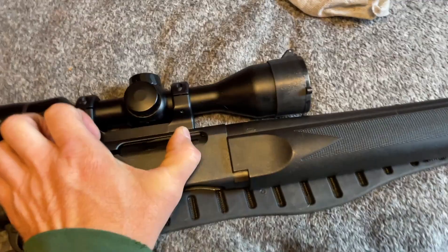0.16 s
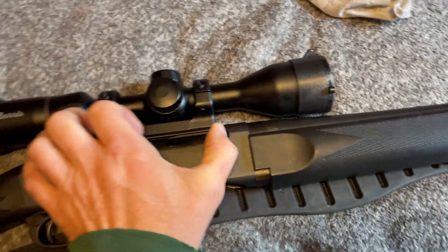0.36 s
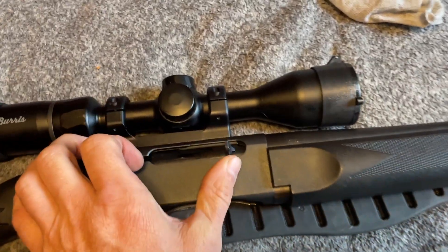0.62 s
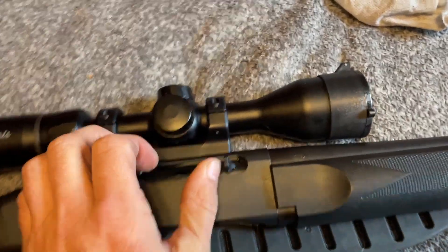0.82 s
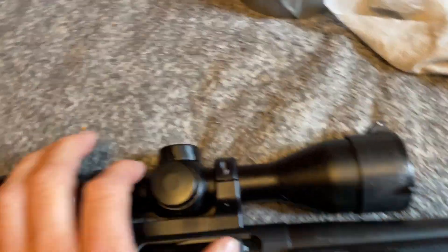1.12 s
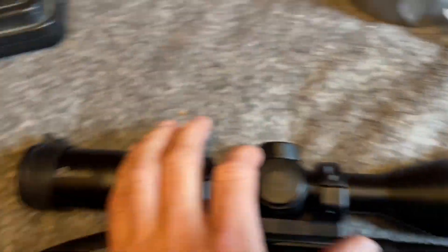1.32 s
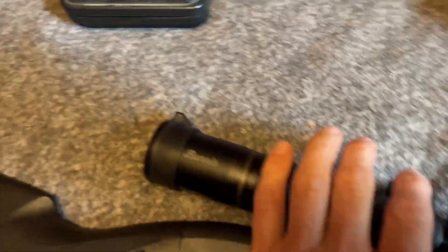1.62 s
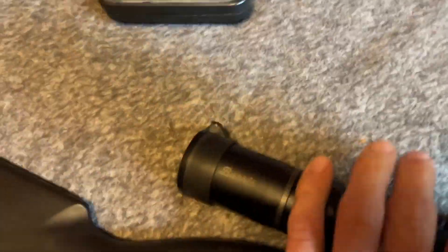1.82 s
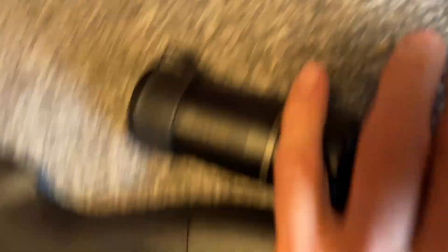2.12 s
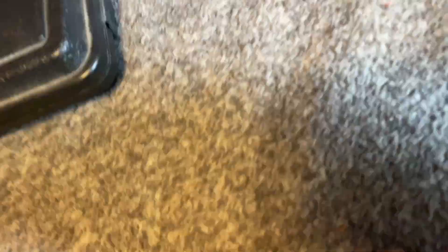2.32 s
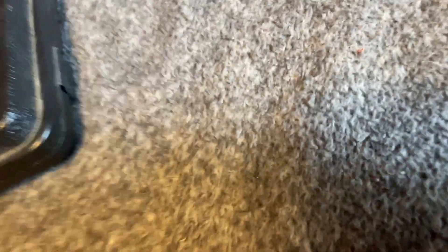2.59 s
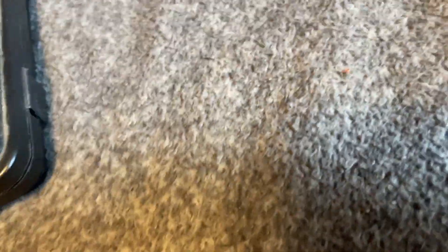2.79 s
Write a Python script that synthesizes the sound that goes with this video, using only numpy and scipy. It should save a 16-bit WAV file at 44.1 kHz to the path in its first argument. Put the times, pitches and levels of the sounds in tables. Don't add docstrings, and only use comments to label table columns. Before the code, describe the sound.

Rifle bolt snaps shut with a hard metal clack, then is lifted and racked with sharp clicks

```python
import sys
import numpy as np
from scipy import signal
from scipy.fft import rfft, irfft, next_fast_len
from scipy.io import wavfile
from scipy.ndimage import uniform_filter1d

SR = 44100
rng = np.random.default_rng(int(sys.argv[2]) if len(sys.argv) > 2 else 0)


def master(y):
    cut = np.clip(np.atleast_2d(y).T, -1, 1)
    pcm = np.round(cut * 32767)
    wavfile.write(sys.argv[1], SR, pcm.astype(np.int16))


def amplitude_ratio(level_db):
    exponent = np.asarray(level_db, float) / 20
    return 10 ** exponent


N = 130095
LEAD = int(.3 * SR)
SIZE = next_fast_len(N + 2 * LEAD)
HZ = np.arange(SIZE // 2 + 1) * SR / SIZE + 1
T = (np.arange(SIZE) - LEAD) / SR


def unit(x):
    return x / np.sqrt(np.mean(x ** 2))


def shape(points):
    p = np.array(points, float)
    return np.interp(np.log(HZ), np.log(p[:, 0]), p[:, 1])


def colour(x, points):
    return irfft(rfft(x) * unit(amplitude_ratio(shape(points))), SIZE)


def curve(rows, col=1):
    r = np.array(rows, float)
    outside = -120 * (col == 1)
    return np.interp(T, r[:, 0], r[:, col], left=outside, right=outside)


def walk(rate_hz):
    hold = int(SR / rate_hz)
    steps = np.repeat(rng.standard_normal(SIZE // hold + 1), hold)
    return unit(uniform_filter1d(steps, hold)[:SIZE])


def ring(x, hz, t60):
    r = np.exp(-np.log(1000) / (max(t60, 1e-4) * SR))
    angle = 2 * np.pi * hz / SR
    return signal.lfilter([2 * np.sqrt(1 - r) * np.sin(angle)], [1, -2 * r * np.cos(angle), r * r], x)


def tilt(x, bright_db):
    low = signal.sosfilt(signal.butter(2, 4000, "low", fs=SR, output="sos"), x)
    high = signal.sosfilt(signal.butter(2, 4000, "high", fs=SR, output="sos"), x)
    return low - amplitude_ratio(bright_db) * high


# mode_hz, level_db, t60_s
STEEL_MODES = [(1055, 0, .035), (1390, -3, .025), (1715, -1, .03), (2050, -5, .025), (2760, -4, .02),
               (3770, 0, .03), (4350, 0, .025), (5200, -7, .03), (6070, -5, .02), (6700, -8, .02),
               (7500, -7, .025), (13300, -5, .01)]


def strike(push, chance, crack_kernel, level_db, bright_db, rattle_ms, body_hz, pin_t60):
    steel = 0
    for (hz, mode_db, t60), c in zip(STEEL_MODES, chance):
        detuned_hz = hz * (1 + .012 * np.sin(9 * c))
        steel = steel + amplitude_ratio(mode_db + 2.5 * c) * ring(push, detuned_hz, t60)
    ring_db = 0.5 + .35 * level_db
    steel = tilt(amplitude_ratio(ring_db) * steel / np.sqrt(len(STEEL_MODES)), bright_db)

    crack = np.convolve(push, crack_kernel)[64:len(push) + 64]
    body_db, body_q = 4, 6.4
    hit = tilt(amplitude_ratio(5) * crack, bright_db) + amplitude_ratio(body_db) * ring(push, body_hz, 4.4 * body_q / body_hz)

    if rattle_ms > 8 and level_db > 0:
        pin = ring(push, 10860, pin_t60)
        hit = hit + amplitude_ratio(-13) * pin * np.abs(hit + steel).max() / np.abs(pin).max()
    gain = amplitude_ratio(level_db) / np.abs(hit + steel).max()
    return hit * gain, steel * gain


# start_s, peak_db, bright_db, rattle_ms, body_hz
CLOSE_HITS = [(.101, -22, 0.5, 5.4, 1879), (.137, -34.5, 0, 5.1, 4058), (.191, -17.5, -8.5, 5, 1577),
              (.192, -20, -11, 4, 3815), (.211, -27, -18, 2.7, 1715), (.222, -19, -17, 5, 1593),
              (.229, -23, -14, 5, 1500), (.2335, 2.5, 9.5, 10, 4388), (.2355, 5.5, 0, 8.1, 1691),
              (.238, -2.5, 1.5, 9.2, 1090), (.247, -12, -5, 4, 1710), (.766, -45, -35, 2.8, 1927),
              (.937, -51, -23, 5, 602), (1.077, -48, 1, 2.5, 4580), (1.195, -65, -25, 6, 1508),
              (1.28, -50.5, -32, 12, 1006), (1.821, -41, -9, 4.5, 1893), (1.948, -44, -33, 7.8, 1083)]
# start_s, peak_db, bright_db, rattle_ms, body_hz
FAR_HITS = [
    (1.506, -44, 0, 7.8, 1310),
    (1.567, -49.5, -1.5, 5.4, 2490),
    (1.696, -51, -7, 5.7, 2230),
]
# start_s, peak_db, bright_db, rattle_ms, body_hz
RACK_HITS = [(2.173, -12, -16, 7, 2500), (2.1825, -16, 0, 4, 4934), (2.212, -20, -13, 7, 1897),
             (2.237, -21.5, -14.5, 4, 2285), (2.2415, -5.5, 0.5, 4.5, 2453), (2.248, -23, -13.5, 4, 1820),
             (2.350, -15.5, -9, 4, 3710), (2.3545, -16, -10.5, 4, 2535), (2.359, -16.5, -14, 3, 2008),
             (2.362, -9.5, -17.5, 6.5, 3500), (2.380, -27, -12, 3, 2510), (2.390, -24, 0.5, 2.7, 4000),
             (2.401, -10.5, -8, 6, 2050), (2.4145, -14.5, -8, 4, 1692), (2.419, -21.5, -12.5, 6, 2293),
             (2.441, -15.5, -14, 5, 1291), (2.459, -26.5, -13.5, 4, 1998), (2.469, -24.5, -9.5, 5, 2345),
             (2.487, -17.5, 5.5, 2.8, 6530), (2.510, -13, -3, 7, 2487), (2.563, -23.5, 9.5, 4, 13060),
             (2.577, -17.5, -6.5, 4, 1501), (2.598, 1, 9, 4.5, 2804), (2.6, 0.5, 0, 5, 4300),
             (2.601, -10.5, -6.5, 5.4, 1145), (2.669, -15.5, -6, 4, 1718), (2.671, 4, 2, 8.5, 1463),
             (2.673, -0.5, 3, 6, 7300), (2.677, -11.5, -5.5, 6, 1399), (2.814, -40, 7.5, 4, 4000)]
# freq_hz, density_db (per Hz)
CRACK_SPECTRUM = [(200, -25), (600, -17), (1600, -0.5), (3000, -2.5), (4400, -4), (7000, -3), (10500, -2),
                  (13500, -8.5), (15600, -13)]


def contacts():
    dry, wet = np.zeros(SIZE), np.zeros(SIZE)
    t = np.arange(LEAD // 2) / SR
    crack_kernel = colour(np.eye(1, SIZE, 64)[0], CRACK_SPECTRUM)[:256]
    earlier_hit = (-0.2662, 8, -1.5, 6, 2499)
    # hits, room send in dB
    groups = (([earlier_hit], 0), (CLOSE_HITS, -2.5), (FAR_HITS, 24.5), (RACK_HITS, -6.5))
    for hits, room_db in groups:
        for start_s, peak_db, bright_db, rattle_ms, body_hz in hits:
            envelope = np.interp(t * 1e3 / rattle_ms, [0, .3, 1], [0, 1, 0]) ** 1.5
            push = rng.standard_normal(len(t)) * envelope
            chance = rng.standard_normal(len(STEEL_MODES))
            pin_t60 = .1 if start_s < 1 else .04
            hit, steel = strike(push, chance, crack_kernel, peak_db, bright_db, rattle_ms, body_hz, pin_t60)
            i = LEAD + int(round(start_s * SR))
            if start_s > 0:
                dry[i:i + len(t)] += hit + steel
            wet[i:i + len(t)] += (hit + amplitude_ratio(-8) * steel) * amplitude_ratio(room_db)
    return dry, wet


# start_s, level_db, bright_db
PUSH = [
    (.095, -58.5, -4),
    (.19, -61, -4),
    (.197, -42, -8),
    (.215, -34, -11),
    (.225, -26, -13),
    (.236, -25, -10),
]
# start_s, level_db, bright_db
DRAW = [
    (2.163, -46.5, -4.5),
    (2.173, -35, -13),
    (2.201, -38, -14),
    (2.226, -31.5, -11),
    (2.24, -26, -12.5),
    (2.253, -29, -10),
]
# start_s, level_db, bright_db
RACK = [
    (2.348, -33, -13),
    (2.46, -33, -13),
    (2.476, -29, -3),
    (2.51, -24.5, -4.5),
    (2.544, -35, -5.5),
    (2.575, -30.5, 5),
    (2.653, -30.5, 7),
    (2.672, -24, 1.5),
    (2.693, -27.5, -6.5),
]
# freq_hz, density_db (per Hz)
SCRAPE_SPECTRUM = [(150, -12), (550, -4), (2230, -1), (5500, -15), (7400, -5), (9300, -14), (13000, -3),
                   (15600, -11.5)]


def scrape():
    grains_per_s = 22000
    happens = rng.random(SIZE) < grains_per_s / SR
    grain_size = amplitude_ratio(-1.0 * np.log(rng.random(SIZE) + 1e-9))
    grit = unit(happens * grain_size * rng.standard_normal(SIZE))
    steel = unit(sum(amplitude_ratio(db) * ring(grit, hz, t60 / 2) for hz, db, t60 in STEEL_MODES))
    sound = unit(colour(grit, SCRAPE_SPECTRUM) + amplitude_ratio(-11.5) * steel)
    sound = sound * amplitude_ratio(1.8 * walk(90))
    return sum(amplitude_ratio(curve(rows)) * tilt(sound, curve(rows, col=2)) for rows in (PUSH, DRAW, RACK))


# start_s, peak_db, pitch_hz, t60_s
THUMPS = [(.239, -29.5, 132.7, 0.087), (.58, -41.5, 75, .12), (0.771, -44.5, 251.5, 0.086),
          (0.938, -44.5, 179.4, .06), (1.281, -45.5, 172.2, 0.077), (1.817, -26.5, 85.86, 0.054),
          (1.843, -34.5, 54.83, 0.12), (2.25, -34.5, 104, 0.055), (2.528, -26.5, 145.6, 0.09),
          (2.598, -20.5, 175.6, 0.059), (2.673, -13, 262.8, 0.042), (2.678, -21.5, 150.8, 0.065),
          (2.684, -19, 95, 0.049), (2.744, -43, 300, 0.036), (2.871, -44, 70, .12)]


def thumps():
    out, t = np.zeros(SIZE), np.arange(LEAD) / SR
    for start_s, peak_db, hz, t60 in THUMPS:
        i = LEAD + int(start_s * SR)
        onset = 1 - np.exp(-t / 0.0037)
        out[i:i + LEAD] += amplitude_ratio(peak_db - 60 * t / max(t60, .01)) * onset * np.sin(2 * np.pi * hz * t)
    return out


# freq_hz, t60_s
ROOM_T60 = [(150, 0.13), (700, 0.42), (2000, 0.45), (5000, 0.49), (8500, 0.3), (14000, 0.36)]
# freq_hz, gain_db
ROOM_COLOUR = [(300, 0), (1500, 0.5), (6500, 0), (8300, -7), (10000, -7), (12500, 4), (15000, -2)]


def room(x):
    t, tails = np.arange(SIZE) / SR, 0
    noise = rfft(rng.standard_normal((4, SIZE)))
    for k, (_, t60) in enumerate(ROOM_T60):
        share = shape([(hz, float(j == k)) for j, (hz, _) in enumerate(ROOM_T60)])
        tails = tails + irfft(noise * share, SIZE) * amplitude_ratio(-60 * np.minimum(t / t60, 4))
    rise = 1 - np.exp(-t * 1e3 / 0.9)
    nearby = amplitude_ratio(8) * np.exp(-t * 1e3 / 2.2)
    tails = tails * (rise + nearby) * (t < 1)
    tails = tails / np.sqrt(np.sum(tails[0] ** 2))
    echo = irfft(rfft(x) * amplitude_ratio(shape(ROOM_COLOUR)) * rfft(tails), SIZE)
    blend_angle = 1.2 * walk(25)
    return amplitude_ratio(-9) * (np.cos(blend_angle) * echo[:2] + np.sin(blend_angle) * echo[2:])


# start_s, level_db
HANDLING = [(0.0, -52), (0.21, -48), (0.24, -34), (0.43, -63), (0.59, -47), (0.7, -50), (0.82, -49),
            (0.9, -58), (1.06, -53), (1.17, -66), (1.3, -56), (1.45, -64), (1.54, -54), (1.78, -60),
            (1.82, -41), (1.94, -56.5), (2.26, -43), (2.28, -57), (2.66, -34.5), (2.68, -21.5), (2.74, -65),
            (2.95, -48)]
# freq_hz, density_db (per Hz)
RUMBLE_SPECTRUM = [(13, -31.5), (22, -11.5), (59, -2.5), (116, -7), (193, -12), (323, -11.5), (900, -48),
                   (1170, -65), (1980, -120)]
# start_s, level_db
RUSTLE = [
    (1.46, -64.5),
    (1.706, -60.5),
    (1.898, -69),
    (2.15, -66),
    (2.25, -57),
    (2.34, -60.5),
    (2.7, -52),
    (2.82, -52.5),
    (2.95, -62),
]
# freq_hz, density_db (per Hz)
HUSH_SPECTRUM = [(200, -13), (2200, -19), (3400, -26.5), (7100, -33), (9000, -19), (11000, -20),
                 (13200, -21), (14500, -26.5), (15600, -53)]


def background():
    noise = rng.standard_normal((4, SIZE))
    rustle = amplitude_ratio(curve(RUSTLE) + 2.6 * walk(28))
    hush = np.hypot(amplitude_ratio(-65), rustle) * amplitude_ratio(0.72 * walk(11))
    rumble = amplitude_ratio(np.minimum(curve(HANDLING), -48) - 7.0 + 2.5 * walk(25))
    return np.array([hush * colour(noise[k], HUSH_SPECTRUM) + rumble * colour(noise[k + 2], RUMBLE_SPECTRUM)
                     for k in range(2)])


# freq_hz, gap_rad
PORT_PHASE = [(120, .6), (350, 1.4), (1800, 1.1), (2200, -1.3), (5700, -1.5), (7500, -2.1), (8600, -3.0),
              (10000, -3.4), (11800, -5.8), (16000, -6.6)]
# freq_hz, share (0 to 1)
LIKENESS = [(60, 0.92), (300, 0.15), (1000, 0.18), (5000, 0.31), (8000, 0.99), (10200, 0.95), (14000, 0.38)]
# freq_hz, lean_db
PORT_LEAN = [(150, -2.5), (300, -2.4), (700, -1.5), (1500, -1), (3000, -1.4), (6000, 1.5), (10000, 5),
             (13000, 2.5)]


def ports(near, left, right):
    like = np.clip(shape(LIKENESS), 0, 1)
    scatter = .6 * (1 - like) * walk(61.78)[:len(HZ)]
    gap = shape(PORT_PHASE) + scatter
    side = np.array([[.5], [-.5]])
    own = rfft(np.array([left, right]))
    common = np.exp(1j * gap * side) * (rfft(near) + np.sqrt(like) * own[0])
    return irfft(amplitude_ratio(shape(PORT_LEAN) * side) * (common + np.sqrt(1 - like) * own), SIZE)


def scene():
    dry, wet = contacts()
    slide, low = scrape(), thumps()
    around = room(wet + amplitude_ratio(-9.0) * slide + amplitude_ratio(-2.5) * low) + amplitude_ratio(-0.5) * background()
    near = dry + slide + low
    turn = np.clip((T - 1.4) * 10, 0, 1) * np.pi / 2
    held = sum(ports(w * near, *(w * around)) for w in (np.cos(turn), np.sin(turn)))
    return held[:, LEAD:LEAD + N]


def top_cut(x):
    return signal.sosfilt(signal.butter(12, 15700, fs=SR, output="sos"), x)


def record(dry):
    top_hz, drive_db, ceiling = 15700, 2.5, 0.91
    low_pass = signal.ellip(8, .2, 45, top_hz, fs=SR, output="sos")
    x = signal.sosfilt(low_pass, dry * amplitude_ratio(drive_db))
    mix = np.clip(x, -ceiling, ceiling)
    return top_cut(mix)


dry = scene()
out = record(dry)
master(out)
```